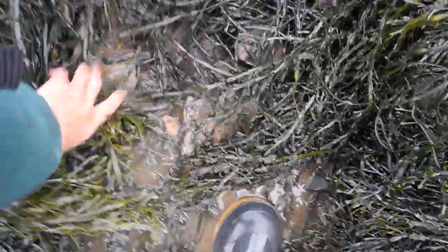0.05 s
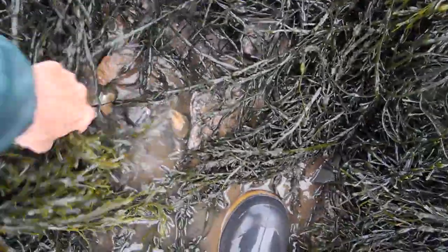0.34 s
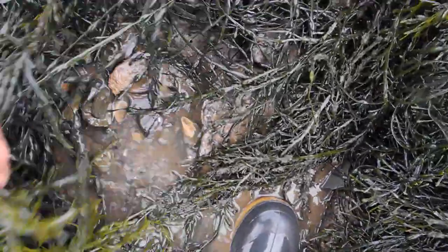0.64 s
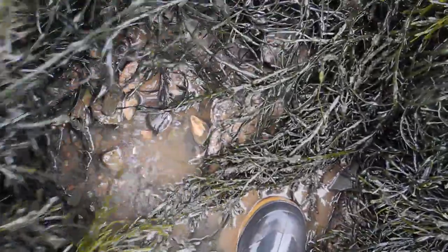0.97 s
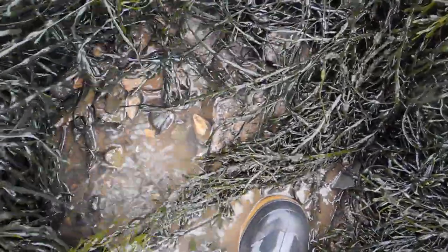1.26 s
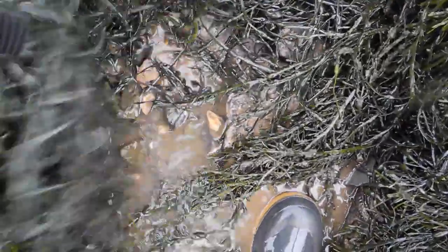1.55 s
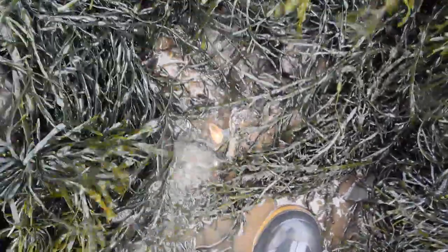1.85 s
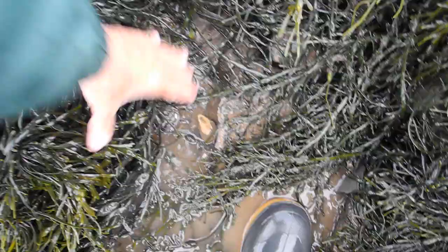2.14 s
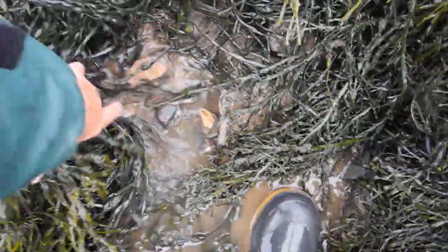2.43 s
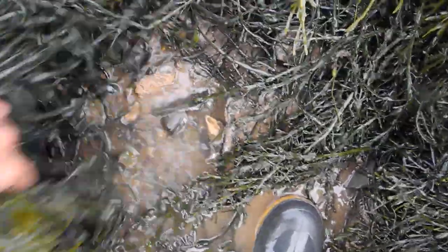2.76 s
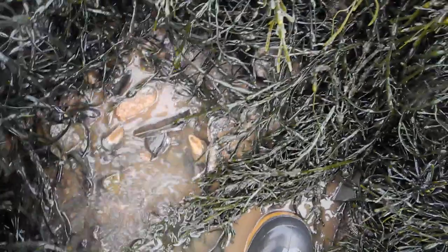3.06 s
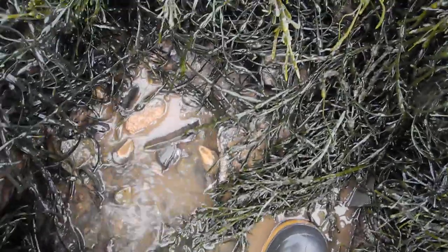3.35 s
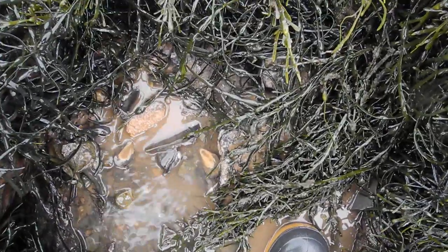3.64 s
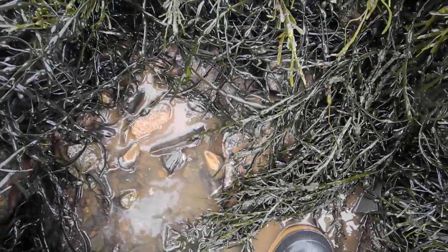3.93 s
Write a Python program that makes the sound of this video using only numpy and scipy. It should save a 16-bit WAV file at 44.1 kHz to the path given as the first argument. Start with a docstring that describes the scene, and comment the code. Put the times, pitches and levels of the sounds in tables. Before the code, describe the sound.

On a muddy shore, wet seaweed is pulled aside with close swishes, snaps and small gurgles, slides back, and is pulled again with a sharp squelch. Low wind rumbles on the microphone over a faint, distant wash.

```python
"""Wind rumbles on the microphone and a wet crackle swells close by: on a muddy shore a hand grabs
seaweed and drags it aside; a clump flops back and is torn away again. Fronds rub and unstick, strands
and air pockets snap, bubbles ring and water drains off.
Short gusts buffet the microphone; far behind lies a faint shore wash."""
import sys
import numpy as np
from scipy import signal
from scipy.fft import rfft, irfft
from scipy.io import wavfile
from scipy.ndimage import uniform_filter1d

SR = 44100
rng = np.random.default_rng(int(sys.argv[2]) if len(sys.argv) > 2 else 0)


def master_out(mix):
    """Clip the mix to full scale and print it as 16-bit PCM to the path in sys.argv[1]."""
    frames = np.transpose(np.atleast_2d(mix))
    ceiling = np.clip(frames, -1, 1)
    pcm = np.round(ceiling * 32767).astype(np.int16)
    wavfile.write(sys.argv[1], SR, pcm)


N = 176400
TIME = np.arange(N) / SR

# Table levels are relative. Colour of the distant shore: f/Hz, level/dB
WASH_COLOUR = [(100, -24), (420, 6), (700, -6), (950, -5.5), (1200, -4.5), (1800, -12.5), (2800, -35.5),
               (6500, -20.5), (10000, -27.5), (16000, -31)]
# How alike the shore is left and right: f/Hz, correlation
WASH_COHERENCE = [(100, 1), (1400, 0.94), (3100, 0.28), (7000, .1)]
# Wind pressure on the microphone: t/s, level/dB
WIND_LEVEL = [(0.0, -32), (0.54, -35), (0.78, -40.5), (0.859, -32.5), (0.9, -44), (1.12, -31.5),
              (1.53, -34), (1.57, -28), (1.69, -34), (1.95, -31.5), (2.05, -38), (2.63, -43), (2.67, -34),
              (2.96, -32.5), (2.99, -37.5), (3.17, -30.5), (3.27, -45), (3.59, -35), (3.93, -35),
              (4.0, -30.5)]
# Gusts on the microphone: middle t/s, half length/s, level/dB
WIND_GUSTS = [(0.842, 0.028, -33.5), (1.155, 0.058, -28), (1.208, 0.013, -21.5), (1.249, 0.02, -24),
              (1.344, 0.039, -25.5), (1.426, 0.012, -19.5), (1.462, 0.032, -21.5), (1.58, 0.16, -31),
              (1.578, 0.014, -21.5), (1.797, 0.038, -28.5), (1.945, 0.043, -25.5), (2.01, 0.027, -28.5),
              (2.184, 0.032, -31), (2.309, 0.066, -34.5), (2.893, 0.021, -26.5), (2.923, 0.011, -25.5),
              (2.958, 0.01, -15.5), (3.033, 0.03, -26.5), (3.153, 0.021, -16.5), (3.642, 0.059, -30),
              (3.817, 0.017, -22), (3.898, 0.029, -29)]
# Colours of the wind's rumble and of a gust: f/Hz, level/dB
RUMBLE_COLOUR = [(15, -40), (30, -21), (50, -10), (75, -5), (105, 1.5), (160, -3.5), (220, -14.5),
                 (290, -23), (400, -15.5), (520, -23.5), (800, -23.5), (1500, -59), (4000, -54.5)]
GUST_COLOUR = [(40, -12.5), (120, 1.5), (200, -1.5), (275, -7), (355, 1.5), (440, -1), (560, -17.5),
               (750, -26), (1200, -48), (6000, -72)]
# Water running off the pulled weed: t/s, f/Hz, level/dB
RUNOFF = [(.46, 1790, -52), (.55, 1650, -42.5), (.66, 1460, -41), (0.771, 1130, -44), (.88, 1096, -60)]
# Ringing bubbles and drips: t/s, level/dB, f/Hz
BUBBLE_RINGS = [(0.187, -19.5, 1024), (0.231, -20, 843), (.246, -25.5, 936), (.454, -25, 1560),
                (0.467, -24, 1850), (.484, -23, 2080), (0.68, -32, 1430), (1.779, -27, 1130),
                (1.832, -24.5, 3800), (1.878, -21, 6400), (2.4232, -12, 6100), (2.743, -30, 5500)]
# Snapping strands and air pockets: t/s, level/dB, f/Hz, width/octaves
STRAND_SNAPS = [(0.1927, -14, 4670, 0.96), (0.231, -14.5, 3020, 0.55), (0.4336, -22, 3380, 0.52),
                (0.452, -26.5, 1980, 0.92), (0.4838, -22, 2240, 0.93), (0.736, -32, 4300, 1),
                (1.013, -35, 6800, 0.51), (1.201, -41.5, 5600, 0.64), (1.45, -32.5, 7500, .5),
                (1.533, -16.5, 5950, 0.4), (1.6008, -24.5, 6550, 0.32), (1.7565, -28.5, 5400, 0.67),
                (1.7807, -28.5, 1500, 0.76), (1.8009, -22, 4340, 1), (1.813, -23.5, 1650, 0.21),
                (2.4226, -15, 6070, 0.28), (2.4624, -16, 3400, 0.64), (2.475, -17, 3900, 0.41),
                (2.4813, -16.5, 2360, 0.24), (2.505, -10.5, 3010, 0.52), (2.533, -12, 2280, 0.25),
                (2.557, -19, 2380, 0.78), (2.5693, -13.5, 3240, 0.42), (2.5884, -17, 3900, 0.43),
                (2.607, -19.5, 2030, 0.63), (2.618, -15, 2070, 0.7), (2.6206, -15, 2200, 0.66),
                (2.6494, -21, 1790, 0.47), (3.0402, -19, 7350, 0.27)]
# Colour of the clump peeling off the mud: f/Hz, level/dB
TEAR_COLOUR = [(1000, -26), (1400, -2.5), (2150, -4), (2850, 4), (3500, -28)]
# Rustle of each handling: t/s, middle level/dB, treble level/dB, top level/dB
GRAB_AND_DRAG = [(0.0, -47, -39.5, -51), (.045, -49.5, -39, -53), (.115, -38.5, -32, -45),
                 (.165, -38, -39.5, -55), (.195, -29, -18, -43), (.232, -32, -27, -46),
                 (.275, -33, -36, -55.5), (.294, -45.5, -50, -58), (.345, -42, -49, -60),
                 (.428, -33.5, -34, -47.5), (.51, -41, -41, -57), (.64, -40.5, -43.5, -54),
                 (.85, -48.5, -48.5, -54.5), (1.06, -55, -54.5, -58.5)]
FLOP_BACK = [(1.08, -52, -54, -62.5), (1.254, -46, -47.5, -53), (1.286, -58.5, -62.5, -69),
             (1.514, -42, -43, -47.5), (1.534, -40.5, -39, -28.5), (1.552, -36, -37.5, -44),
             (1.734, -42, -43, -50), (1.794, -34.5, -34.5, -42), (2.04, -56, -59, -65)]
TEAR_AWAY = [(2.1, -54.5, -54.5, -61), (2.406, -45, -46, -51.5), (2.503, -21, -21, -40),
             (2.56, -28, -28.5, -48), (2.618, -30.5, -34.5, -49), (2.635, -39, -44, -60),
             (2.69, -40, -44.5, -54.5), (2.946, -40.5, -44.5, -57), (3.0, -55, -51, -57)]
SETTLE = [(3.08, -52.5, -53.5, -56.5), (3.23, -63, -67.5, -74), (3.6, -57.5, -65, -63.5),
          (4.0, -55, -86, -85)]
# Colours of the three rustle bands: f/Hz, level/dB
MIDDLE_BAND = [(250, -2), (500, 3), (900, -3), (1300, 6), (2700, -1.5), (3500, -9.5), (5300, -48)]
TREBLE_BAND = [(2400, -29), (3100, 1.5), (4000, -2), (6200, -2.5), (7500, -7.5), (10000, -30)]
TOP_BAND = [(6500, -8), (8500, -3), (16000, -3)]
# Microphone colour on the close seaweed sounds, mild peaks and a dip near 3.4 kHz: f/Hz, level/dB
MIC_COLOUR = [(950, -5), (1150, 0.5), (1430, -2), (1750, 1), (2180, 0.5), (2450, -0.5), (2780, -1.5),
              (3050, -5), (3450, -7), (4100, 1.5), (4800, -1), (11000, -2), (16000, -7.5)]
# Stretches where the stereo image narrows: start t/s, end t/s
NARROW_SPANS = [(1.027, 2.09), (2.277, 2.523), (3.065, 3.31), (3.37, 3.49), (3.622, 3.755), (3.87, 4.56)]

PORT_DELAY_S, DELAY_SCATTER_S = .000046, .00007  # lag at the right microphone port, scatter either way
CRACKLE = dict(per_s=3500, spread_db=2, cycles=3.2)
DRIPS = dict(per_s=700, spread_db=4, cycles=7)
BUBBLE_CYCLES, BUBBLE_RISE = 7, 0.0041  # cycles to fade to 1/e, upward bend of the pitch


def amp(db):
    """Decibels to gain."""
    return 10 ** (np.asarray(db) / 20)


def unit(x):
    """Scales to rms 1."""
    return x / np.sqrt(np.mean(x ** 2) + 1e-20)


def read(points, hz):
    """Reads a spectrum on a log-frequency axis."""
    f, value = np.transpose(points)
    return np.interp(np.log(hz + 1), np.log(f + 1), value)


def colour(x, points):
    """Filters by a spectrum in dB; the result has rms 1."""
    size = x.shape[-1]
    return unit(irfft(rfft(x) * amp(read(points, np.fft.rfftfreq(size, 1 / SR))), size))


def add(mix, s, sound):
    """Mixes a stereo sound in at a time."""
    part = mix[:, max(round(s * SR), 0):][:, :sound.shape[1]]
    part += sound[:, :part.shape[1]]


def stereo_noise(size, side_db):
    """White noise with a given side level."""
    mid, side = rng.standard_normal((2, size))
    return np.array([mid + amp(side_db) * side, mid - amp(side_db) * side])


def steady(x, size):
    """Evens out level drift slower than size samples."""
    return x / np.sqrt(uniform_filter1d(uniform_filter1d((x ** 2).mean(0), size), size) + 1e-9)


def lean(x, left_db):
    """Tilts the balance to the left, or to the right if negative."""
    return x * amp([[left_db / 2], [-left_db / 2]])


def shore():
    """Far off, a faint, even wash of wind and water, wider in the treble."""
    left, other = rfft(rng.standard_normal((2, N)))
    same = np.clip(read(WASH_COHERENCE, np.fft.rfftfreq(N, 1 / SR)), -1, 1)
    right = same * left + np.sqrt(1 - same ** 2) * other
    return amp(-48.5) * colour(irfft(np.array([left, right]), N), WASH_COLOUR)


def wind_rumble():
    """Lumpy turbulence right at the microphone, following the wind pressure."""
    s, db = np.transpose(WIND_LEVEL)
    lumps_db = 2.2 * unit(uniform_filter1d(uniform_filter1d(rng.standard_normal(N), 2200), 1600))
    turbulence = steady(colour(stereo_noise(N, side_db=-7.5), RUMBLE_COLOUR), size=3000)
    return turbulence * amp(np.interp(TIME, s, db) + 0.5 + lumps_db)


def gusts():
    """Each gust is a short hollow flutter in the microphone port; the harder, the brighter."""
    out, size = np.zeros((2, N)), 8192
    t = (np.arange(size) - size / 2) / SR
    plain_db, knee_hz = -27, 500
    for s, half_s, db in WIND_GUSTS:
        tone = [(hz, level + .6 * (db - plain_db) * (hz > knee_hz)) for hz, level in GUST_COLOUR]
        flutter = steady(colour(stereo_noise(size, side_db=-3.5), tone), size=500)
        add(out, s + t[0], flutter * np.exp(-2 * (t / half_s) ** 2) * amp(db))
    return out


def drain():
    """Small gurgles off the weed, scattered around a pitch that sinks as the water runs out."""
    s, hz, db = np.transpose(RUNOFF)
    out, t = np.zeros((2, N)), np.arange(SR // 20) / SR
    width_hz, per_s, pitch_scatter = 130, 110, .13
    fade = np.exp(-np.pi * width_hz * t)
    fade /= np.sqrt(np.sum(fade ** 2) * per_s / SR / 2)
    for k, (late, detune, place) in enumerate(rng.random((int((s[-1] - s[0]) * per_s), 3))):
        when = s[0] + (k + 2 * late) / per_s
        turns = t * np.interp(when, s, hz) * (1 + pitch_scatter * (2 * detune - 1))
        tone = np.sin(2 * np.pi * turns * (1 + BUBBLE_RISE * turns / BUBBLE_CYCLES))
        gurgle = tone * fade * np.minimum(turns / 2, 1)
        pan = 1 + amp(-8) * (2 * place - 1) * np.array([[1], [-1]])
        add(out, when, gurgle * amp(np.interp(when, s, db)) * pan)
    return out


def bubbles():
    """A trapped pocket of air rings briefly and rises a little in pitch."""
    out, t = np.zeros((2, N)), np.arange(3000) / SR
    for s, db, hz in BUBBLE_RINGS:
        turns = hz * np.maximum(t - np.array([[0], [PORT_DELAY_S]]), 0)
        age = turns / BUBBLE_CYCLES
        tone = 2 * np.sin(2 * np.pi * turns * (1 + BUBBLE_RISE * age))
        add(out, s, amp(db - 3) * tone * np.exp(-age) * np.minimum(turns, 1))
    return out


def snaps():
    """A strand lets go: a burst around one pitch, slower the lower it is, then a short spatter."""
    out, size = np.zeros((2, N)), 2048
    t, f = np.arange(size) / SR, np.fft.rfftfreq(size, 1 / SR) + 1
    spatter_s = .005
    for s, db, hz, octaves in STRAND_SNAPS:
        rise_s = .00065 * np.sqrt(5000 / hz)
        age = t / rise_s
        spatter = amp(-20) * np.exp(-t / spatter_s) * np.minimum(age, 1)
        spectrum = rfft(stereo_noise(size, side_db=-11)) / (1 + (np.log2(f / hz) / octaves) ** 2) ** 1.1
        spectrum[1] *= np.exp(-2j * np.pi * f * PORT_DELAY_S)
        burst = steady(unit(irfft(spectrum)), size=100) * (age * np.exp(1 - age) + spatter)
        onset_rms = np.sqrt(np.mean(burst[:, t < .003] ** 2))
        add(out, s, burst * amp(db + 1) / onset_rms)
    return lean(out, left_db=-1.0)


def wet_films(per_s, spread_db, cycles):
    """Tiny wet films burst at random, each a short ring reaching the microphone from its own direction."""
    pitches, pool = np.geomspace(600, 15000, 56), 1500
    chance = per_s * N / SR / len(pitches) / pool
    out = np.zeros((2, N))
    for hz in pitches:
        draws = rng.random((pool, 5))
        _, when, size, sign, place = draws[draws[:, 0] < chance].T
        at = (when * N).astype(int)
        strength = amp(spread_db * np.minimum(-np.log(size), 4)) * np.where(sign < .5, -1, 1)
        lag = np.round((PORT_DELAY_S + DELAY_SCATTER_S * (2 * place - 1)) * SR).astype(int)
        clicks = np.zeros((2, N))
        clicks[0, at], clicks[1, (at + lag) % N] = strength, strength
        r, turn = np.exp(-hz / cycles / SR), 2 * np.pi * hz / SR  # decay and phase step per sample
        out += hz * signal.lfilter([0, np.sin(turn)], [1, -2 * r * np.cos(turn), r * r], clicks + 1e-18)
    return unit(out)


def tear():
    """Countless wet films part in one dense squelch as the clump peels off the mud."""
    middle_s, half_s = 2.512, 0.028
    squelch = steady(colour(wet_films(**CRACKLE), TEAR_COLOUR), size=300)
    return squelch * amp(-18.5) * np.exp(-((TIME - middle_s) / half_s) ** 8)


def rustle():
    """Close up: crackle, small drips and the swish of sliding fronds, swelling with each handling."""
    s, middle, treble, top = np.transpose(np.vstack([GRAB_AND_DRAG, FLOP_BACK, TEAR_AWAY, SETTLE]))
    crackle = wet_films(**CRACKLE)
    drips = amp(-2) * wet_films(**DRIPS)
    swish = amp(1) * unit(stereo_noise(N, side_db=2))
    weed = crackle + drips + swish

    def band(points, db, left_db):
        return lean(steady(colour(weed, points), size=1300) * amp(np.interp(TIME, s, db)), left_db)
    return (band(MIDDLE_BAND, middle - 1, left_db=-1.3)
            + band(TREBLE_BAND, treble, left_db=-1.5)
            + band(TOP_BAND, top + 4, left_db=3.5))


def close_colour(x):
    """The microphone colours the close sounds; mud, sleeve and boot return a few short reflections."""
    f = np.fft.rfftfreq(N, 1 / SR)
    count, span_s = 7, .016
    delays = span_s * (np.arange(count) + .5 + rng.random(count)) / count
    echoes = sum(np.exp(-2j * np.pi * f * d - d / span_s) for d in delays)
    return irfft(rfft(x) * amp(read(MIC_COLOUR, f)) * (1 + amp(-14.5) * echoes), N)


def narrow(x, below_hz):
    """At times bass and middle close in to the centre while the treble stays wide."""
    closed = uniform_filter1d(sum(1. * ((TIME > a) & (TIME < b)) for a, b in NARROW_SPANS), size=700)
    mid, side = (x[0] + x[1]) / 2, (x[0] - x[1]) / 2
    low = irfft(rfft(side) / (1 + (np.fft.rfftfreq(N, 1 / SR) / below_hz) ** 60), N)
    side = side - closed * low
    return np.array([mid + side, mid - side])


def scene():
    """Seaweed close by, wind on the microphone, the shore behind."""
    seaweed = close_colour(rustle() + tear() + snaps() + bubbles() + drain())
    return seaweed + wind_rumble() + gusts() + shore()


def record(dry):
    """Changing width, the full-scale limit and the recorder's band limit."""
    limited = np.clip(narrow(dry, below_hz=3030), -1, 1)
    lowpass = signal.firwin(511, cutoff=15850, window=("kaiser", 9), fs=SR)
    return signal.oaconvolve(limited, lowpass[None], "same")


dry = scene()
out = record(dry)
master_out(out)
```